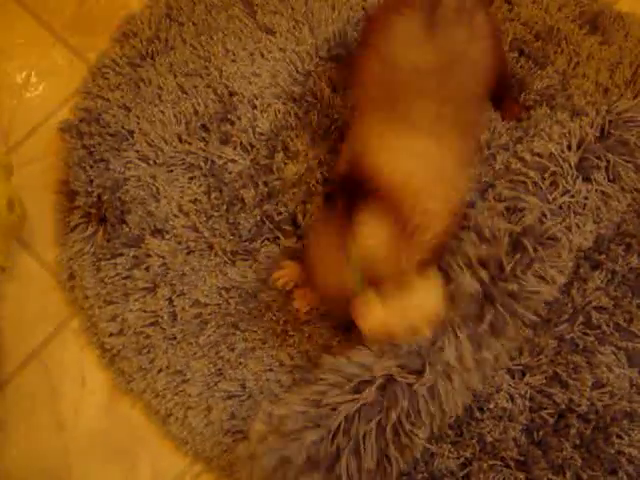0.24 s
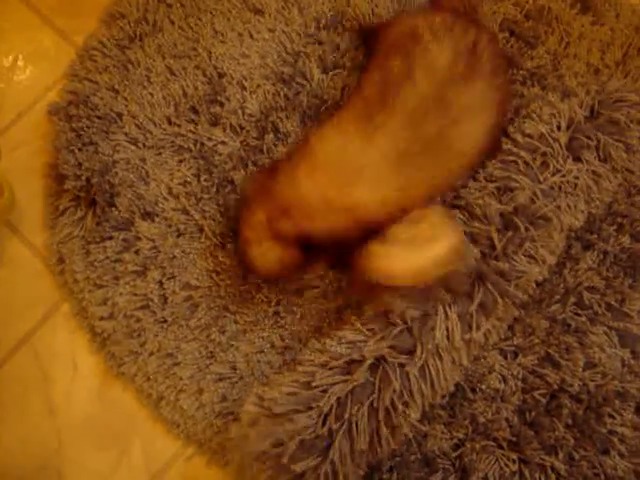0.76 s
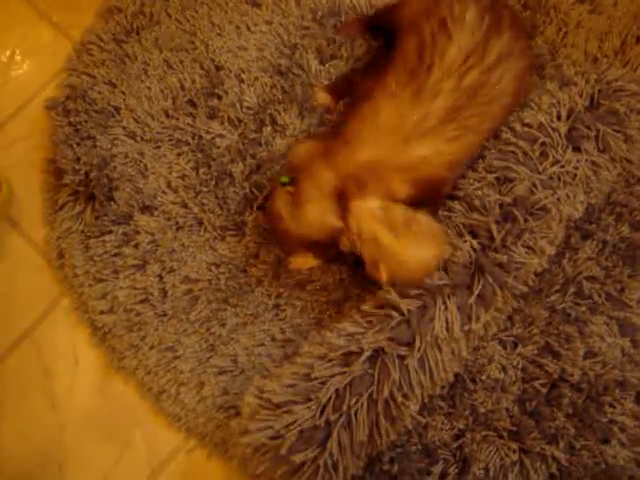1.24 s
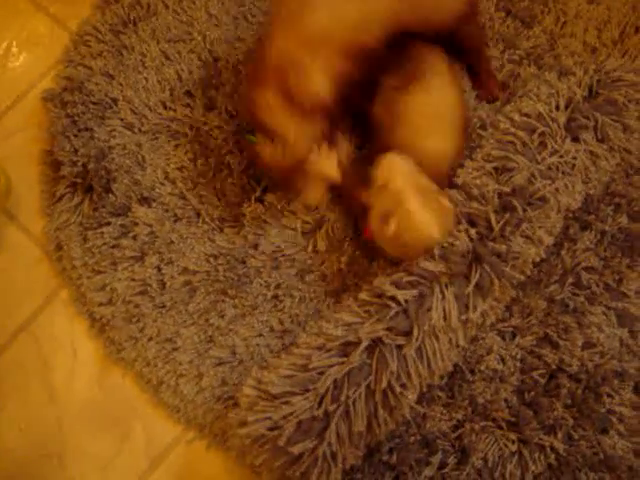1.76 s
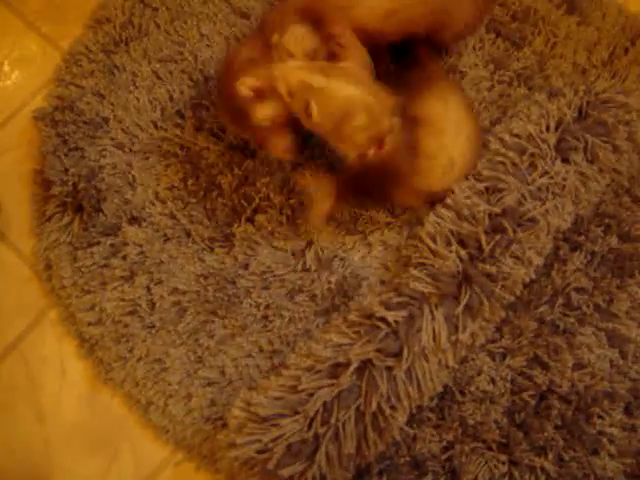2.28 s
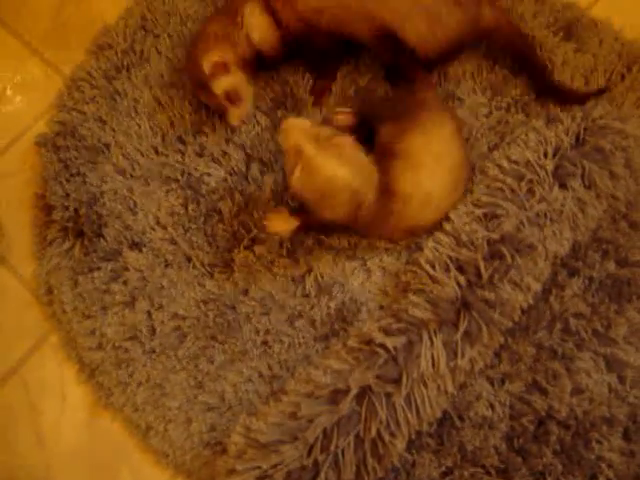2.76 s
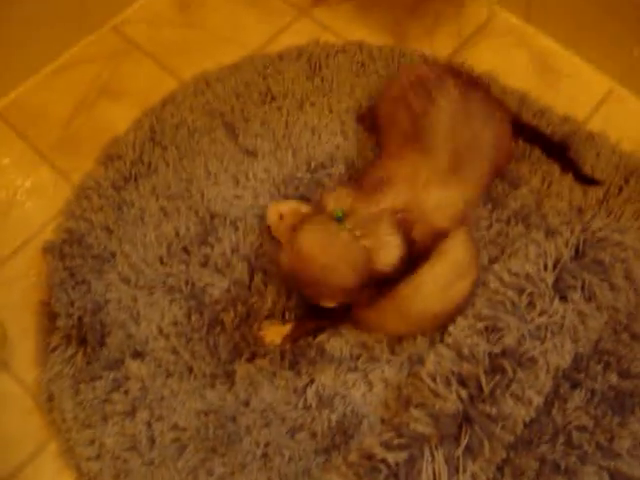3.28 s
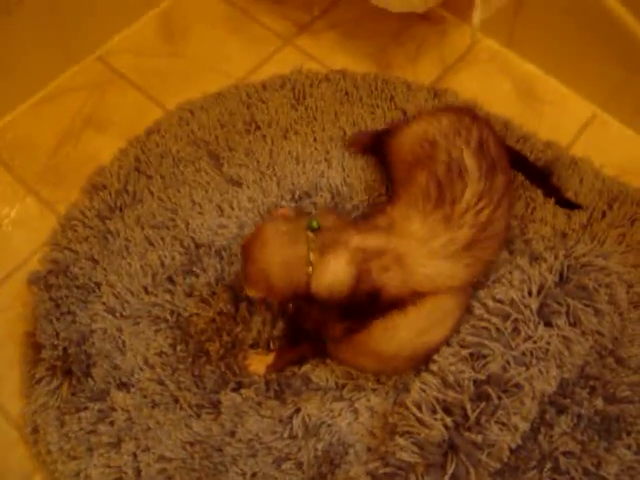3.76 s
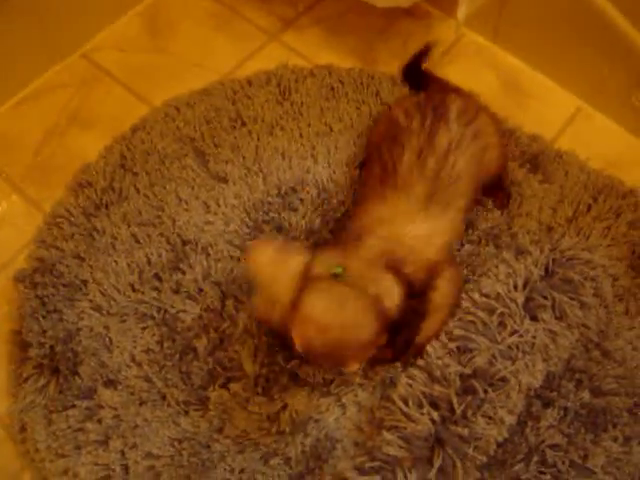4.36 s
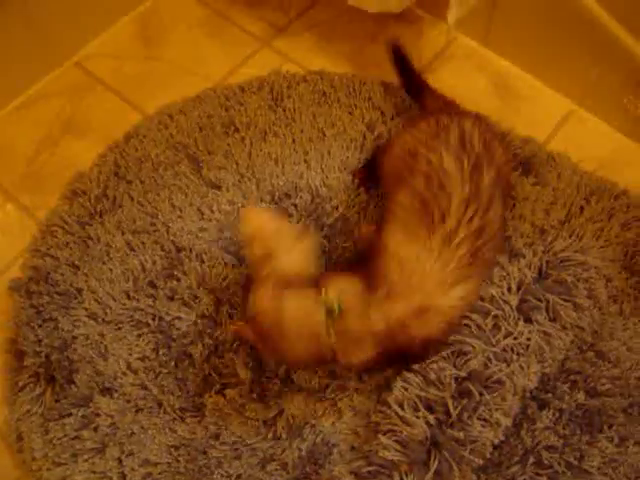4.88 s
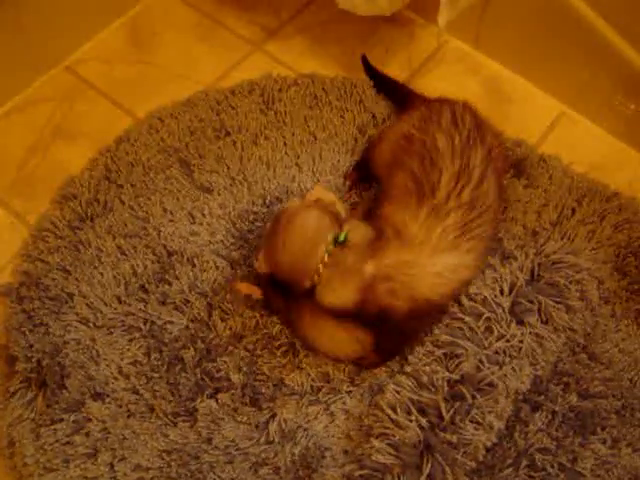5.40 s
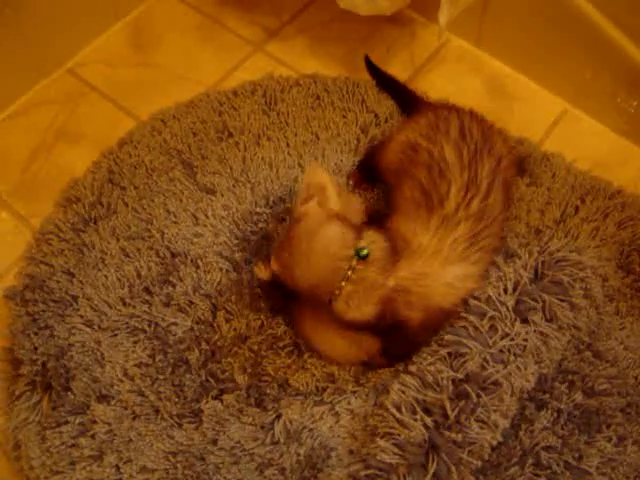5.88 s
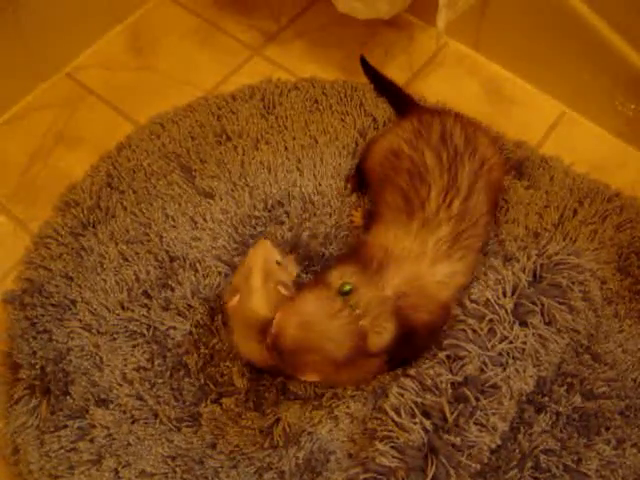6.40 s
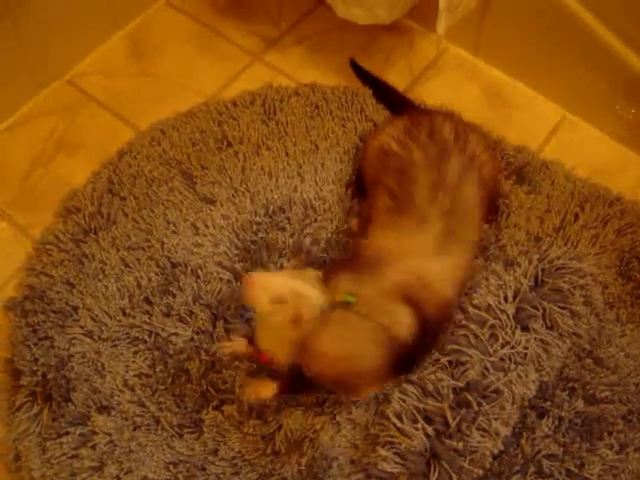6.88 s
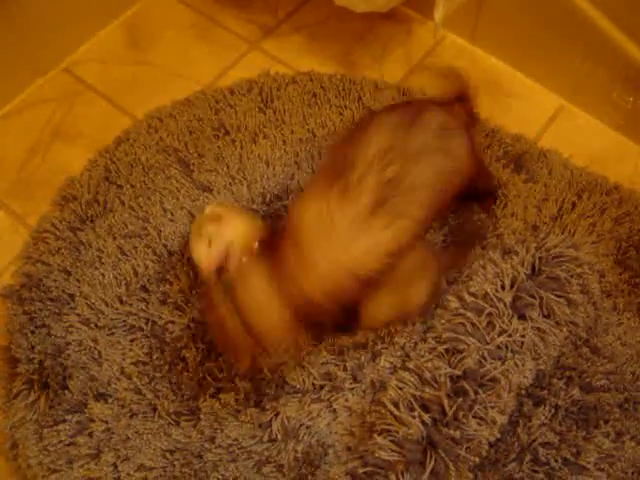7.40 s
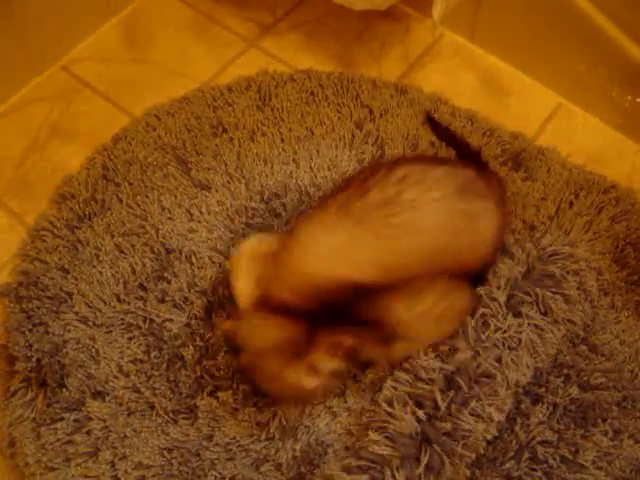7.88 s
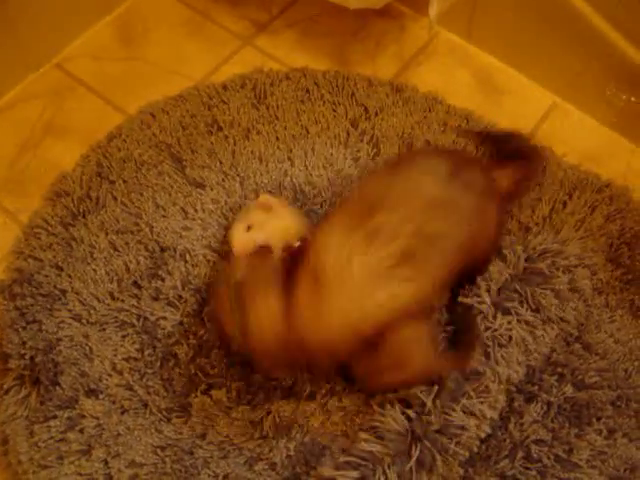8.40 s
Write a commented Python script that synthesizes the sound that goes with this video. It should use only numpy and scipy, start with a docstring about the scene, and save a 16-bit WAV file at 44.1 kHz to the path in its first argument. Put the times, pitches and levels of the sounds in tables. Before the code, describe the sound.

Two ferrets wrestle in a shaggy bed, a tiny high collar bell jingling in bursts over rustling fabric, huffs, clucks and brief squeaks.

```python
"""Room air and mains hum, rustling fabric, a grunt and a huff open the scene, then a tiny bell rings.
Two ferrets wrestle in a shaggy bed in a quiet tiled room; a faint clock ticks behind them.
The collar bell is one shell mode that rings while its pellet flies and is choked when the pellet lands.
Yelp, chuckle, squeak and clucks are pulsed folds and puffs of air filtered by a throat; whines are whistles.
Huffs, rustle, scrapes, claws and dragging are noise or random grains shaped by swells and spectra."""
import sys
import numpy as np
from scipy import signal
from scipy.io import wavfile
from scipy.ndimage import uniform_filter1d

SR = 44100
rng = np.random.default_rng(int(sys.argv[2]) if len(sys.argv) > 2 else 0)


def dump(signal):
    """Clip the signal to [-1, 1] and save it as 16-bit WAV at the path in sys.argv[1]."""
    limited = np.clip(np.atleast_2d(signal).T, -1, 1)
    pcm = np.round(limited * 32767).astype(np.int16)
    wavfile.write(sys.argv[1], SR, pcm)


N = 381465
TIME = np.arange(N) / SR
EDGE_HZ = 10080  # upper band edge: limits the vocal partials and the final low-pass
SWELL_DEPTH_DB = 21  # a swell climbs this far during its rise and drops as far during its fall


def amp(db):
    """Logarithmic level: converts decibels to a gain."""
    return 10 ** (np.asarray(db) / 20)


def unit(x):
    """Power normalization: scales a signal to rms 1."""
    return x / np.sqrt(np.mean(x ** 2) + 1e-20)


def add(mix, s, sound):
    """Superposition: adds a sound into the mix at time s."""
    part = mix[max(round(s * SR), 0):][:len(sound)]
    part += sound[:len(part)]


def colour(x, points, size=2048):
    """Minimum-phase filtering: a causal filter of unit energy with the given relative spectrum."""
    hz, db = np.transpose(points)
    log_bins = np.log(abs(np.fft.fftfreq(size, 1 / SR)) + 1)
    bin_db = np.interp(log_bins, np.log(hz + 1), np.maximum(db, -100))
    log_gain = np.log(amp(bin_db))
    # the Hilbert transform of the log gain supplies the phase
    taps = np.fft.ifft(np.exp(np.conj(signal.hilbert(log_gain)))).real
    return signal.oaconvolve(x, taps / np.linalg.norm(taps))[:len(x)]


def drift(count, hz):
    """Slow random modulation: normal knots, hz of them a second, joined by straight lines."""
    knots = np.arange(count) * hz / SR
    return np.interp(knots, np.arange(count), rng.standard_normal(count))


def burst(length, rise):
    """Transient envelope: an exponential rise under a Gaussian decay with time constant length."""
    t = np.arange(int(2 * length * SR)) / SR
    return (1 - np.exp(-t / rise)) * np.exp(-(t / length) ** 2)


def swells(rows):
    """Power summation: the gain of overlapping swells, each rising and falling evenly in dB."""
    power = 0
    for s, rise, fall, db in rows:
        away = np.maximum((s - TIME) / rise, (TIME - s) / fall).clip(0, 8)
        power = power + amp(db - SWELL_DEPTH_DB * away) ** 2
    return np.sqrt(power)


def grains(per_s, spread_db):
    """Shot noise: random tiny impacts of uneven size and sign, rms 1."""
    impacts = rng.random(N) < per_s / SR
    signs = np.sign(rng.standard_normal(N))
    return unit(impacts * signs * amp(2 * spread_db * rng.random(N)))


def resonate(x, hz, width):
    """Time-varying resonance: a one-pole filter of gain 1, shifted to follow the curve hz."""
    turn = np.exp(2j * np.pi * np.cumsum(hz) / SR)
    r = np.exp(-np.pi * width / SR)
    return 2 * (turn * signal.lfilter([1 - r], [1, -r], x / turn)).real


def ringing(x, modes):
    """Modal resonance: adds narrow fixed modes to a sound."""
    return x + sum(amp(db) * signal.lfilter(*signal.iirpeak(hz, hz / width, SR), x) for hz, width, db in modes)


def call(rows, throat, jitter, shimmer, smear, closes_s, modes=(), mouth=(), uneven_db=3.0, mouth_width_hz=450):
    """Source and filter: uneven fold pulses and puffs of air pass the throat; a closing mouth dulls the end."""
    s, *columns = np.transpose(rows)
    t = np.arange(s[0], s[-1], 1 / SR)
    hz, db, rough = (np.interp(t, s, c) for c in columns)
    rough = np.clip(rough, 0, 1)
    turns = np.cumsum(hz * (1 + jitter * drift(len(t), 452))) / SR
    folds = np.zeros(len(t))
    for k in range(1, int(EDGE_HZ / hz.max())):
        level = amp(uneven_db * drift(len(t), 86))  # each partial swells and fades by itself
        lag = smear * k ** 2  # high partials lag and soften each pulse
        folds += level * np.cos(2 * np.pi * k * turns - lag)
    folds = unit(folds) * (1 + shimmer * drift(len(t), 499.7))
    puff_shape = 0.096 + np.exp(-(turns % 1) / 0.086)  # a puff of air at each cycle
    puffs = unit(puff_shape * rng.standard_normal(len(t)))
    source = ((1 - rough) * folds + rough * puffs) / np.hypot(1 - rough, rough)
    voice = ringing(colour(source, throat), modes)
    if len(mouth):
        at, centre, gain = np.transpose(mouth)
        voice = voice + amp(np.interp(t, at, gain)) * resonate(voice, np.interp(t, at, centre), mouth_width_hz)
    dull = signal.lfilter(*signal.butter(1, 1400, fs=SR), voice)
    shut = np.clip((t - closes_s) / 0.032, 0, 1)
    blend = (1 - shut) * unit(voice) + shut * unit(dull)
    out = np.zeros(N)
    add(out, s[0], amp(db) * blend * signal.windows.tukey(len(t), .05))
    return out


# spectrum of the room air: (frequency [Hz], relative level [dB per Hz])
AIR_SPECTRUM = [(15, -69.5), (25, -20), (90, -3), (113, -5.5), (148, -7.5), (239, -3), (271, -5.5),
                (348, -3.5), (901, -9.5), (1420, -13.5), (1640, -12.5), (2280, -14.5), (3490, -15.5),
                (7220, -17), (10000, -21), (13000, -61.5), (22000, -120)]
AIR_DB = -58
# mains hum partials: (frequency [Hz], rms level [dB])
HUM_PARTIALS = [(120, -70), (240, -78.5)]
# spectrum of the clock's beat: (frequency [Hz], relative level [dB per Hz])
CLOCK_SPECTRUM = [(300, -19.5), (700, 2.5), (1000, -0.5), (1250, 0), (1600, -5.5), (2400, -3.5),
                  (4000, -8.5), (9000, -26)]
# modes of the clock's case: (frequency [Hz], width [Hz], gain [dB])
CASE_MODES = [(910, 14, 15.5), (1150, 38, 8), (1230, 44, 0)]


def background(tick_db=-56, tock_db=-53, first_s=0.5246, tick_s=0.072):
    """Stationary noise, harmonic hum and modal ringing: room air, mains and a distant clock blurred by the room."""
    beats = np.zeros(N)
    for second in range(int(N / SR)):  # tick and tock alternate, a second apart
        level = amp(tock_db if second % 2 else tick_db)
        add(beats, first_s + second, level * burst(tick_s, rise=0.012))
    clock = ringing(colour(beats * rng.standard_normal(N), CLOCK_SPECTRUM), CASE_MODES)
    hum = np.zeros(N)
    for hz, db in HUM_PARTIALS:
        hum += amp(db) * np.sqrt(2) * np.sin(2 * np.pi * hz * TIME + .4 * drift(N, 22))
    air = amp(AIR_DB) * colour(rng.standard_normal(N), AIR_SPECTRUM, size=8192)
    return air + hum + clock


# bodies rubbing on the fabric: (time of peak [s], rise [s], fall [s], level [dB])
FABRIC_RUBS = [(0.02, 0.24, 0.82, -46.5), (0.748, 0.01, 0.05, -48), (1.15, 0.7, 1, -54.5),
               (1.475, 0.014, 0.12, -42.5), (1.65, 0.14, 0.98, -53), (6.38, 0.071, 0.093, -65),
               (7.43, 0.5, 0.19, -56), (7.58, 0.13, 0.56, -52), (7.92, 0.3, 0.39, -51.5),
               (8.39, 0.3, 0.17, -49.5), (8.63, 0.34, 0.22, -55)]
# spectrum of the fabric: (frequency [Hz], relative level [dB per Hz])
FABRIC_SPECTRUM = [(300, -1.5), (1200, 1.5), (2000, -4), (3300, -4), (5000, -5), (7000, -11), (10000, -4.5)]
# claws and teeth ticking or scratching: (time [s], length [s], level [dB])
CLAW_TICKS = [(0.734, 0.03, -48), (1.013, 0.0045, -40.5), (1.155, .012, -52), (1.37, 0.0044, -60),
              (1.477, .02, -68), (1.814, 0.026, -48), (3.438, 0.0017, -41), (4.418, 0.0051, -42.5),
              (6.365, 0.046, -55.5), (7.415, 0.04, -48.5), (7.454, 0.034, -50.5)]
# spectrum of a claw: (frequency [Hz], relative level [dB per Hz])
CLAW_SPECTRUM = [(500, -5.5), (1500, -14), (2500, -2), (3200, -4), (4300, 1.5), (6000, -3.5), (10000, -38)]
RUSTLE_REST_DB = -70  # the rustle between rubs


def scuffle():
    """Stick-slip friction and impact: fibres slip under the bodies; now and then a claw ticks or scratches."""
    force = np.zeros(N)
    for s, length, db in CLAW_TICKS:
        add(force, s, amp(db) * burst(length, rise=0.0003))
    rubbing = np.hypot(swells(FABRIC_RUBS), amp(RUSTLE_REST_DB))
    fibres = rubbing * grains(6000, spread_db=14.5) * amp(2 * drift(N, 50))
    claws = colour(force * rng.standard_normal(N), CLAW_SPECTRUM)
    return colour(fibres, FABRIC_SPECTRUM) + claws


# short low grunts: (time [s], length [s], mean pitch [Hz], level [dB])
GRUNT_EVENTS = [(0.005, 0.13, 431.4, -50), (0.412, 0.02, 788, -47), (0.698, 0.039, 421, -52),
                (1.124, 0.046, 499, -45.5), (1.211, 0.025, 493, -42), (1.231, 0.028, 546, -40.5),
                (1.249, 0.029, 389, -42.5), (1.277, 0.056, 522.5, -41), (1.325, 0.018, 523, -42),
                (1.641, 0.032, 373, -39), (1.77, 0.033, 369, -48), (1.814, 0.021, 392, -46),
                (3.238, 0.013, 412, -39.5), (3.261, 0.025, 267, -46.5), (4.667, 0.028, 283, -47),
                (4.692, 0.018, 350, -41.5), (4.712, 0.037, 181, -47.5), (4.73, 0.018, 290, -51),
                (7.529, 0.021, 380, -40), (7.56, 0.035, 319, -37), (7.885, 0.047, 307, -42),
                (8.509, 0.021, 340, -36.5)]


def grunts(overtone=0.23, wobble=0.11):
    """Frequency modulation: brief, wobbly, nearly pure low tones with one weak octave partial."""
    out = np.zeros(N)
    for s, length, hz, db in GRUNT_EVENTS:
        shape = burst(length, rise=0.0058)
        phase = 2 * np.pi * np.cumsum(hz * (1 + wobble * drift(len(shape), 239))) / SR
        add(out, s, amp(db) * shape * (np.sin(phase) + overtone * np.sin(2 * phase)))
    return out


# breathy huffs of the two animals: (time of peak [s], rise [s], fall [s], level [dB])
HUFF_SWELLS = [(0.04, 0.056, 0.039, -50), (0.79, 0.02, 0.076, -51), (1.3, 0.06, 0.12, -52),
               (1.51, .03, 0.1, -55.5), (4.68, 0.02, 0.088, -53.5), (7.514, 0.009, 0.092, -45.5),
               (7.59, 0.078, 0.12, -47), (7.89, 0.12, 0.14, -44), (8.03, 0.062, 0.16, -42.5),
               (8.39, 0.29, 0.25, -49.5)]
# spectrum of the breath: (frequency [Hz], relative level [dB per Hz])
HUFF_SPECTRUM = [(120, -57), (200, -17), (300, -9.5), (437, -2), (527, -1), (603, -12.5), (663, 3),
                 (857, 1.5), (929, 0.5), (1020, -7), (1590, -19), (2060, -24), (2450, -17), (3670, -36),
                 (5000, -15), (6500, -49), (11000, -120)]


def huffs(flutter_db=3.1):
    """Turbulent flow: uneven puffs of air pass a nearly closed mouth."""
    push = swells(HUFF_SWELLS) * amp(flutter_db * drift(N, 120))
    return colour(push * grains(3000, spread_db=7.5), HUFF_SPECTRUM)


# shakes of the collar, from a flick to a long roll of the pellet:
# (time [s], length [s], ring level [dB], clatter level [dB])
COLLAR_SHAKES = [(0.064, 0.032, -39, -42.5), (0.11, 0.015, -36.5, -50), (0.129, 0.019, -44.5, -57),
                 (0.324, 0.028, -56, -40), (0.45, 0.0074, -41.0, -37), (0.463, 0.031, -30, -40),
                 (0.51, 0.043, -21, -41.5), (0.559, 0.029, -40, -58), (0.588, 0.046, -46.5, -59.0),
                 (0.637, 0.016, -40.5, -60.5), (0.771, 0.012, -36.5, -50), (0.816, 0.0081, -37.5, -52.0),
                 (0.837, 0.013, -33, -51), (0.851, 0.053, -40.5, -45), (0.93, 0.023, -29, -40.5),
                 (0.961, 0.061, -38, -54), (1.029, 0.029, -50, -63), (1.137, 0.029, -45, -60.0),
                 (1.19, 0.012, -37.5, -55.5), (1.233, 0.01, -27, -48), (1.246, 0.023, -36, -49.5),
                 (1.409, 0.007, -45.5, -45), (1.755, 0.022, -44.5, -56), (1.783, 0.023, -45, -54),
                 (1.83, 0.012, -43, -49), (1.848, 0.048, -39.5, -49.5), (1.908, 0.038, -40.5, -57),
                 (1.993, 0.034, -28, -46.5), (2.035, 0.0053, -31.5, -47.0), (2.048, 0.029, -22.5, -41.5),
                 (2.095, 0.014, -31.0, -59), (2.136, 0.024, -23.5, -37), (2.165, 0.0071, -32, -50),
                 (2.182, 0.017, -35.5, -50), (2.208, 0.015, -36, -47), (2.236, 0.012, -29, -42),
                 (2.253, 0.029, -35.5, -47.5), (2.316, 0.044, -30, -41.5), (2.362, 0.045, -25.5, -46.5),
                 (2.413, 0.057, -27.5, -42.5), (2.471, 0.066, -32.5, -50.5), (2.542, 0.014, -42.0, -54),
                 (2.579, 0.018, -32, -49), (2.601, 0.049, -37.5, -50), (2.652, 0.051, -27, -41),
                 (2.721, 0.05, -46.5, -58), (2.82, 0.023, -39.5, -54.0), (2.882, 0.017, -39, -52.5),
                 (2.902, 0.021, -48.0, -61.0), (3.062, 0.005, -43, -56), (3.144, 0.0053, -53, -60),
                 (3.19, 0.036, -40.5, -45.5), (3.231, 0.015, -12, -30.5), (3.259, 0.04, -19, -44),
                 (3.306, 0.018, -11, -32), (3.332, 0.021, -26, -43.5), (3.358, 0.035, -31, -51.5),
                 (3.404, 0.018, -40, -55), (3.443, 0.018, -51, -64), (3.485, 0.0055, -47.5, -62),
                 (4.228, 0.031, -25.5, -41), (4.264, 0.014, -37, -54), (4.288, 0.042, -41.5, -55),
                 (4.342, 0.0056, -44, -59), (4.373, 0.016, -45, -61), (4.419, 0.014, -39.5, -55.5),
                 (4.466, 0.0068, -33.5, -54.5), (4.507, 0.017, -43.0, -57), (4.534, 0.009, -44.5, -60.5),
                 (4.597, 0.0086, -33.5, -49.5), (4.63, 0.028, -52.5, -64), (4.672, 0.02, -56, -66),
                 (4.772, 0.015, -46.5, -61.5), (4.85, 0.049, -45.5, -56), (4.903, 0.046, -46.5, -59),
                 (4.955, 0.032, -48.0, -63), (4.995, 0.023, -38.5, -53), (5.022, 0.008, -43, -66),
                 (5.092, 0.025, -30.5, -47.0), (5.13, 0.0048, -42.5, -50), (5.153, 0.016, -38, -51),
                 (5.236, 0.023, -37.5, -51), (5.268, 0.024, -40.0, -50), (5.347, 0.015, -37.5, -55),
                 (5.389, 0.016, -50.5, -62), (5.464, 0.021, -46, -61), (5.586, 0.016, -45, -58.5),
                 (5.77, 0.011, -39, -65), (5.802, 0.016, -28, -48.5), (5.823, 0.047, -22.5, -48),
                 (5.875, 0.041, -27, -47.5), (5.923, 0.013, -34.5, -48), (5.943, 0.015, -37, -54),
                 (5.978, 0.029, -47.5, -64), (6.315, 0.007, -40, -54), (6.331, 0.023, -37.0, -51.5),
                 (6.379, 0.011, -29, -44), (6.395, 0.0051, -34, -57.0), (6.425, 0.021, -34, -50),
                 (6.477, 0.0087, -53, -60), (6.509, 0.018, -46, -60.0), (6.561, 0.008, -36.5, -46),
                 (6.58, 0.006, -34, -49), (6.654, 0.0084, -43.0, -66), (6.67, 0.008, -46, -52),
                 (6.708, 0.009, -20.5, -40.5), (6.714, 0.045, -31.5, -45.5), (6.804, 0.025, -45, -63.5),
                 (6.864, 0.0097, -33, -49.0), (6.899, 0.027, -42, -55.5), (6.962, 0.048, -33, -46.0),
                 (7.008, 0.021, -41, -55), (7.034, 0.03, -47.5, -57), (7.141, 0.005, -42.0, -58.0),
                 (7.153, 0.0036, -40, -60.5), (7.17, 0.015, -39, -61), (7.211, 0.011, -33, -40),
                 (7.242, 0.039, -29.5, -51.0), (7.294, 0.039, -45.5, -61), (7.341, 0.012, -29, -42.0),
                 (7.36, 0.058, -34.5, -48.5), (7.422, 0.039, -41.5, -65), (7.465, 0.026, -52.5, -39),
                 (7.504, 0.028, -36.5, -47), (7.535, 0.031, -35.0, -50), (7.579, 0.035, -27.5, -37.0),
                 (7.622, 0.016, -25.5, -42.5), (7.648, 0.047, -27.0, -46.5), (7.69, 0.032, -36, -53.5),
                 (7.725, 0.0084, -36, -48), (7.741, 0.015, -35, -57.0), (7.758, 0.04, -42.0, -54.0),
                 (7.829, 0.011, -31, -44.5), (7.845, 0.061, -36.5, -42.5), (7.91, 0.029, -22, -37),
                 (7.97, 0.012, -21.5, -37), (8.012, 0.02, -36.5, -45), (8.038, 0.0092, -36.5, -50),
                 (8.048, 0.037, -42.5, -55), (8.301, 0.005, -50, -60), (8.33, 0.005, -46, -56),
                 (8.362, 0.013, -42, -53.0), (8.42, 0.0038, -45.5, -56), (8.443, 0.006, -42, -41),
                 (8.475, 0.017, -28.5, -36.5), (8.524, 0.012, -32.0, -46), (8.542, 0.043, -36, -57),
                 (8.601, 0.016, -20.5, -38.5), (8.627, 0.028, -31, -44)]
# bouts of wrestling that keep the collar jiggling lightly: (start [s], end [s], level [dB])
JIGGLE_BOUTS = [(0, 0.17, -46), (.18, 1.18, -57.5), (1.18, 1.754, -61.5), (1.75, 2.945, -58),
                (2.942, 3.6, -60.5), (4.3, 4.771, -67), (4.769, 5.062, -55), (5.051, 6.126, -59.5),
                (6.306, 8.125, -54), (8.28, 8.656, -55)]
# the ring stops at each landing; the small hops stop just before a new shake
FIRST_FLIGHT_S, LANDING_S, CATCH_S = 0.016, 0.0016, 0.014
LANDINGS_PER_S, HOPS_PER_S = 40, 200
SAG_DB = 1  # a shake weakens by this much over its length
SETTLE_DB, SETTLE_DB_PER_S = -19, 155.5  # then the pellet hops on, weaker and dying


def pellet(uneven_db=0.25, hop_spread_db=22):
    """Random impacts: age of the shake, free flight 0-1, ring dB, clatter dB and gain of the small hops."""
    start, length, ring_db, knock_db = np.transpose(COLLAR_SHAKES)
    now = np.maximum(np.searchsorted(start, TIME) - 1, 0)
    age = TIME - start[now]
    shaken = (age > 0) & (age < length[now])
    caught = np.append(start[1:], np.inf)[now] - TIME < CATCH_S
    landing = (rng.random(N) < LANDINGS_PER_S / SR) & (age > FIRST_FLIGHT_S)
    landed = TIME - np.maximum.accumulate(TIME * landing) < LANDING_S
    # each landing draws a new level
    change_db = uneven_db * rng.uniform(-0.83, 1.7, N)[np.cumsum(landing)] * (age > FIRST_FLIGHT_S)
    change_db -= SAG_DB * np.clip((age - FIRST_FLIGHT_S) / length[now], 0, 1)
    settling = amp(ring_db[now] + SETTLE_DB - SETTLE_DB_PER_S * abs(age - length[now]))
    stirring = sum(amp(db) * ((TIME >= begin) & (TIME < end)) for begin, end, db in JIGGLE_BOUTS)
    hop = np.cumsum(rng.random(N) < HOPS_PER_S / SR)
    hop_sizes = unit(amp(hop_spread_db * rng.random(N))[hop])
    hops = hop_sizes * np.hypot(settling, stirring) * ~shaken * ~caught
    return abs(age), shaken * ~landed, ring_db[now] + change_db, knock_db[now] + change_db, hops


BELL_HZ = 6695  # base frequency of the shell mode, before each graze detunes it


def shell_tone(knocks_per_s, jolt, waver, detune_hz):
    """Perturbed normal mode: each graze of the pellet jolts the mode's phase, size and pitch."""
    knock = np.cumsum(rng.random(N) < knocks_per_s / SR)
    phase = np.cumsum(jolt * rng.standard_normal(N))[knock]
    size = np.exp(waver * rng.standard_normal(N) - waver ** 2)[knock]
    hz = BELL_HZ + detune_hz * rng.uniform(-0.5, 1.2, N)[knock]
    return size * np.exp(1j * (2 * np.pi * np.cumsum(hz) / SR + phase))


# spectrum of the pellet clattering on the shell: (frequency [Hz], relative level [dB per Hz])
SHELL_CLATTER = [(3000, -32), (5000, -19), (6000, -11.5), (6500, -17.5), (6900, -14), (7300, 3), (7900, 2),
                 (8700, -7), (10000, -14)]


def bell(edge_s=0.0014, clatter_db=1, jiggle_db=-3, jiggle_ring_db=-3, jiggle_clatter_db=-13, strike_gain=0.706,
         strike_s=0.0032, skid_s=0.0074, graze_db=11, most_grazed=0.94, clump_db=5):
    """Free and damped vibration: ringing in each flight, brief pings and clatter while the pellet rolls."""
    age, free, ring_db, knock_db, hops = pellet()
    # more clatter leaves less pure ring, but some always stays
    contact = np.minimum(amp(knock_db - ring_db + graze_db), most_grazed)
    ring = free * amp(ring_db)
    clatter = free * amp(knock_db + clatter_db) * (0.79 + strike_gain * np.exp(-age / strike_s))
    clatter = uniform_filter1d(clatter, int(skid_s * SR))  # the pellet skids a moment before it strikes
    soft = np.exp(-(np.linspace(-.005, .005, SR // 100) / edge_s * 2) ** 2)
    soft /= soft.sum()  # rounds the edges of every flight and hop
    clean = ring * np.sqrt(1 - contact ** 2) + amp(jiggle_ring_db) * hops
    grazed = ring * contact + amp(jiggle_db) * hops
    tone = signal.oaconvolve(clean, soft, "same") * shell_tone(220, jolt=0.25, waver=0.2, detune_hz=5.2)
    tone += signal.oaconvolve(grazed, soft, "same") * shell_tone(520, jolt=1.3, waver=0.32, detune_hz=240.4)
    tone = signal.sosfilt(signal.butter(2, [6100, 7400], "band", fs=SR, output="sos"), tone.real)
    clumps = unit(amp(clump_db * drift(N, 220).clip(-2, 2)))  # the pellet chatters in little runs
    knocks = grains(2200, spread_db=7.0) * clumps * (clatter + amp(jiggle_clatter_db) * hops)
    return tone + colour(knocks, SHELL_CLATTER)


# the collar scraping through the pile: (time [s], length [s], level [dB])
COLLAR_SCRAPES = [(0.321, 0.014, -22), (0.366, 0.041, -34.5), (0.745, 0.034, -34.5), (0.82, 0.018, -29),
                  (1.69, 0.018, -37), (3.097, 0.047, -42), (4.878, 0.013, -49), (7.332, 0.043, -34.5),
                  (7.426, 0.0083, -30.5), (7.462, 0.058, -25), (8.553, 0.0092, -20.5), (8.588, .012, -34)]
# spectrum of a scrape: (frequency [Hz], relative level [dB per Hz])
SCRAPE_SPECTRUM = [(3000, -27.5), (5500, -18), (7000, -5), (8300, -2), (10000, 3)]


def scrapes():
    """Dry friction: bright gritty strokes of the collar."""
    force = np.zeros(N)
    for s, length, db in COLLAR_SCRAPES:
        add(force, s, amp(db) * burst(length, rise=0.0011))
    return colour(force * grains(3500, spread_db=17.5), SCRAPE_SPECTRUM)


# soft rattling clucks: (time [s], length [s], pitch [Hz], level [dB], mouth [factor on throat frequencies])
CLUCK_EVENTS = [(.75, 0.033, 179.4, -41, 1.08), (0.833, 0.029, 178.4, -52, 1.1),
                (1.222, 0.034, 179.8, -47.5, 1), (1.283, 0.043, 172.6, -47, 1),
                (1.366, 0.0037, 176.4, -49.5, 1.76), (1.467, 0.036, 180, -42, 1.05),
                (4.662, 0.023, 160.2, -46.5, 1), (7.567, 0.031, 160.8, -42.5, 1.03),
                (7.866, 0.035, 164.2, -42, 1.12), (7.915, 0.014, 162.6, -42, 1.12),
                (8.018, 0.03, 167.2, -49, 1.63)]
# throat of the clucks: (frequency [Hz], relative level [dB])
CLUCK_FILTER = [(150, -29), (350, -3.5), (430, -10.5), (535, 4), (660, -6.5), (890, -2.5), (1080, -10),
                (1270, -13.5), (1600, -18.5), (2500, -19.5), (5000, -43), (9000, -58)]


def clucks(attack_s=0.0039, release_s=0.019, sag_db=2, rough=0.58):
    """Source and scaled filter: low creaky calls that start at once, hold and die away."""
    out = np.zeros(N)
    for s, length, hz, db, mouth in CLUCK_EVENTS:
        held_s = s + attack_s
        end_s = held_s + length
        shape = [(s, db - 10), (held_s, db), (end_s, db - sag_db), (end_s + release_s, db - 17.5)]
        rows = [(at, hz, level, rough) for at, level in shape]
        throat = [(f * mouth, gain) for f, gain in CLUCK_FILTER]
        out += call(rows, throat, jitter=0.032, shimmer=0.19, smear=.3, closes_s=s + length)
    return out


# course of the yelp: (time [s], pitch [Hz], level [dB], roughness [0-1])
YELP_COURSE = [(1.057, 335, -39, 0.5), (1.065, 350, -36, 0.25), (1.074, 369.2, -32.5, 0.3),
               (1.092, 369.8, -32, 0.4), (1.101, 352.4, -32, 0.2), (1.11, 346, -34.5, .4),
               (1.122, 315, -37, 0.73), (1.14, 304, -42, 0.8), (1.162, 295, -51, .85), (1.18, 295, -62, .9)]
# throat of the yelp: (frequency [Hz], relative level [dB])
YELP_FILTER = [(200, -42), (365, -2.5), (730, -7), (1100, -24), (1450, -23), (1840, -9), (2250, -13.5),
               (2950, -3.5), (3500, -11), (4150, -6.5), (4850, -7), (5500, -8), (6100, -10.5), (6600, -13),
               (9000, -27)]
# sharp resonances that make the yelp shrill: (frequency [Hz], width [Hz], gain [dB])
YELP_MODES = [(3530, 50, -4), (4080, 60, 8), (4140, 60, 9), (4235, 50, 5), (4420, 40, 2), (4625, 40, 1),
              (4790, 25, 11), (5175, 45, -2), (5520, 55, 3), (5910, 60, 1)]
# the brightest resonance rises as the mouth opens and sinks again: (time [s], frequency [Hz], gain [dB])
YELP_OPENING = [(1.058, 4150, -3), (1.075, 4500, -4), (1.09, 4900, -2), (1.103, 4200, -3),
                (1.125, 4100, -14)]


def yelp():
    """Source, filter and moving formant: a shrill call whose bright resonance rises and sinks."""
    return call(YELP_COURSE, YELP_FILTER, jitter=0.01, shimmer=0.16, smear=0.151, uneven_db=4.5,
                modes=YELP_MODES, mouth=YELP_OPENING, closes_s=1.112)


# course of the chuckle: (time [s], pitch [Hz], level [dB], roughness [0-1])
CHUCKLE_COURSE = [(1.598, 303.3, -44.5, 0.6), (1.615, 287, -37.5, 0.8), (1.635, 289.3, -44.5, 0.5),
                  (1.675, 283, -46.5, 0.95), (1.695, 306.6, -36, 0.6), (1.708, 348, -36, 0.14),
                  (1.719, 352, -33, .12), (1.727, 330, -40.5, 0.13), (1.745, 336, -52, .4)]
# throat of the chuckle: (frequency [Hz], relative level [dB])
CHUCKLE_FILTER = [(200, -44), (345, -8), (690, -6), (1030, -5), (1380, -14), (1600, -26), (1950, -15),
                  (2150, -28), (2480, -16.5), (3000, -22.5), (5000, -29.5), (9000, -24.5)]


def chuckle():
    """Source and fixed filter: a call that alternates between rough puffs and clearer fold pulses."""
    return call(CHUCKLE_COURSE, CHUCKLE_FILTER, jitter=0.016, shimmer=0.42, smear=1.1, closes_s=1.724)


# thin gliding whines: (time [s], length [s], starting pitch [Hz], final pitch [Hz],
# bend [exponent, over 1 glides late], level [dB], fade [dB, negative grows], breathiness gained by the end [ratio])
WHINE_GLIDES = [(2.186, 0.035, 1705, 1750, 1.15, -53.5, 0, .2),
                (3.601, 1.75, 1646, 1633, 1.08, -69, 4.5, 0.33),
                (4.062, 0.34, 3690, 3110, 2.4, -60.5, -3, 1.8),
                (4.059, 0.29, 2710, 2590, 0.94, -69, -4, .3), (4.335, 0.17, 1637, 1594, 1.06, -63, 0, .4),
                (5.697, 0.05, 6100, 5880, 1, -60, 1, .8), (6.968, 0.086, 2760, 2670, 0.97, -63.5, -2, .8),
                (6.999, 0.034, 1240, 1163, 0.91, -55, 0, .2),
                (7.052, 0.127, 1095, 908, .7, -47.5, 13.5, .1), (7.175, 0.31, 3740, 3354, 1.27, -53, 8, .4),
                (7.158, 0.26, 2810, 2562, 1.4, -68, -2, .4), (8.582, 0.12, 3660, 3620, 0.75, -58, -2, .2)]


def whines(waver=0.01, wander=0.006, flutter_db=2, breath=0.29, breath_hz=260, rise_s=0.026, fall=0.31):
    """Whistle tone in turbulent air: faint unsteady glides turn breathy; fall is a share of their length."""
    out = np.zeros(N)
    for s, length, start_hz, end_hz, bend, db, fade_db, tiring in WHINE_GLIDES:
        along = np.linspace(0, 1, int(length * SR))
        count = len(along)
        pitch = start_hz + (end_hz - start_hz) * along ** bend
        pitch = pitch * (1 + waver * drift(count, 500) + wander * drift(count, 40))
        gain = amp(db - fade_db * along + flutter_db * drift(count, 90))
        gain = gain * np.minimum(along * length / rise_s, (1 - along) / fall).clip(0, 1)
        air = resonate(rng.standard_normal(count), pitch, breath_hz)
        air = unit(resonate(air, pitch, breath_hz))
        airy = breath + tiring * along ** 2
        whistle = np.sin(2 * np.pi * np.cumsum(pitch) / SR)
        add(out, s, gain * (whistle + airy * air) / np.hypot(1, airy))
    return out


# course of the squeak: (time [s], pitch [Hz], level [dB], roughness [0-1])
SQUEAK_COURSE = [(4.596, 715, -31, 0.5), (4.602, 696, -32.5, 0.45), (4.614, 644, -36, 0.22),
                 (4.623, 649, -41, 0.28), (4.637, 661, -36, .08), (4.648, 654, -42, 0.097),
                 (4.66, 643, -51, 0.3), (4.68, 657, -52, 0.36), (4.72, 656, -62, 0.6)]
# throat of the squeak: (frequency [Hz], relative level [dB])
SQUEAK_FILTER = [(300, -15), (660, 0), (1320, -4), (1950, -9), (2600, -13.5), (3230, -7), (3900, -14),
                 (4600, -26), (8000, -48)]
# the bright resonance falls as the mouth closes: (time [s], frequency [Hz], gain [dB])
SQUEAK_CLOSING = [(4.597, 3430, -20), (4.613, 3180, -1), (4.622, 2750, 8), (4.63, 2500, 3),
                  (4.638, 2400, -20)]


def squeak():
    """Source, filter and moving formant: a high call whose bright resonance falls."""
    return call(SQUEAK_COURSE, SQUEAK_FILTER, jitter=0.023, shimmer=0.28, smear=1.06, uneven_db=4.5,
                mouth=SQUEAK_CLOSING, closes_s=4.622)


# bodies dragged through the deep pile: (time of peak [s], rise [s], fall [s], level [dB])
PILE_DRAGS = [(7.585, 0.095, 0.045, -42.5), (7.725, 0.1, 0.11, -47.5), (7.82, 0.051, 0.087, -50.5),
              (8.05, .1, .08, -53), (8.295, 0.17, 0.18, -50.5), (8.39, 0.13, 0.21, -45.5),
              (8.494, 0.026, 0.085, -45.5)]
# spectrum of the dull rub: (frequency [Hz], relative level [dB per Hz])
PILE_SPECTRUM = [(120, -33), (270, -11), (500, -4.5), (590, -8), (790, -1), (1170, -5), (1400, -9),
                 (1620, -4), (1800, -23), (2500, -16.5), (6000, -19.5), (10000, -36)]


def drags(flutter_db=1.0):
    """Sliding friction: dense slipping of the pile under a body, muffled by the bed."""
    force = swells(PILE_DRAGS) * amp(flutter_db * drift(N, 60))
    return colour(force * grains(4000, spread_db=7), PILE_SPECTRUM)


def scatter(x, near_db=-8, count=256):
    """Near-field scattering: glancing off bodies and bed rim smears pulses and makes upper partials uneven."""
    taps = unit(rng.standard_normal(count) * np.linspace(1, 0, count) ** 2) * amp(near_db) / np.sqrt(count)
    taps = signal.lfilter(*signal.butter(3, 3600, "high", fs=SR), taps)  # small bodies scatter only the treble
    taps[0] += 1  # the direct path
    return signal.oaconvolve(x, taps / np.linalg.norm(taps))[:N]


def room(x, t60=0.28):
    """Reverberant decay: a short tail of sparse reflections from tiles and walls, t60 in seconds."""
    t = np.arange(SR // 2) / SR
    echoes = rng.standard_normal(len(t)) * (rng.random(len(t)) < .06)
    taps = echoes * (t > .006) * amp(-60 * t / t60)
    return signal.oaconvolve(x, taps / np.linalg.norm(taps))[:N]


def scene(voice_wet_db=-15, bell_wet_db=-29):
    """Direct and reverberant sound: the bell is near and almost dry; the animals wake the room a little."""
    animals = scuffle() + grunts() + huffs() + clucks() + whines() + drags()
    animals += scatter(yelp() + chuckle() + squeak())
    collar = bell() + scrapes()
    tail = room(amp(voice_wet_db) * animals + amp(bell_wet_db) * collar)
    return (animals + collar + tail + background())[None]


def record(dry):
    """Band limitation: a linear-phase low-pass filter removes the treble above EDGE_HZ."""
    taps = signal.firwin(601, EDGE_HZ, window=("kaiser", 7), fs=SR)
    return signal.oaconvolve(dry, taps[None], "same")


dry = scene()
out = record(dry)
dump(out)
```